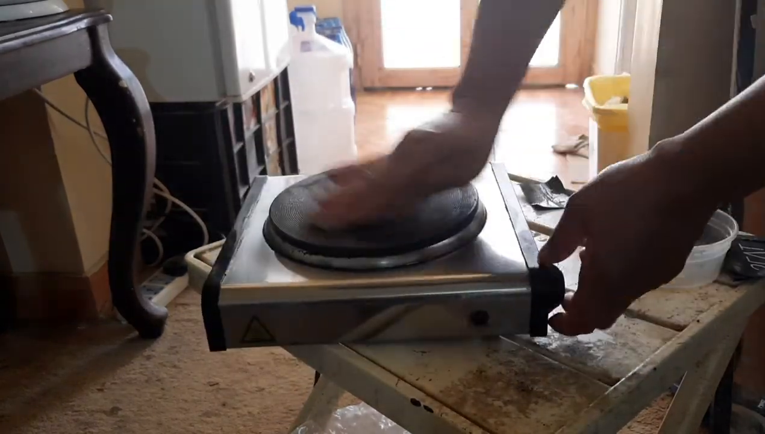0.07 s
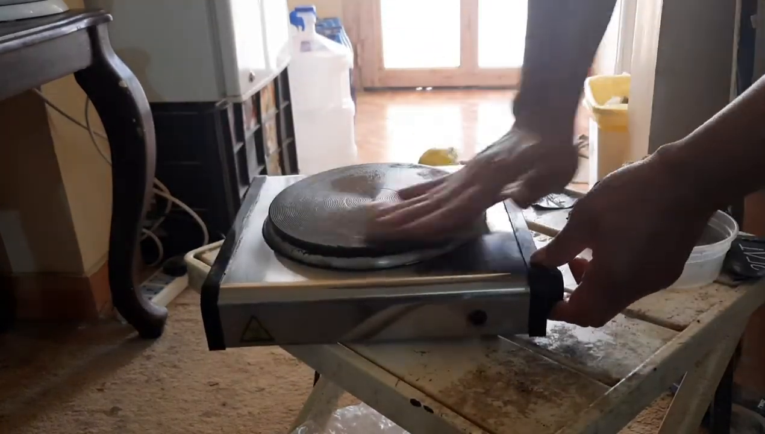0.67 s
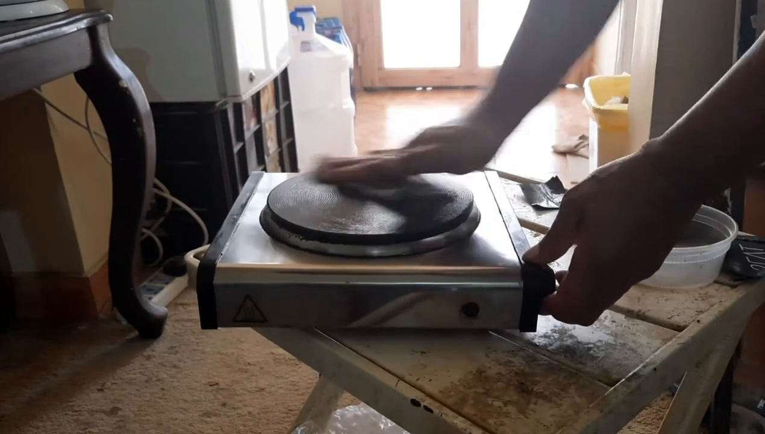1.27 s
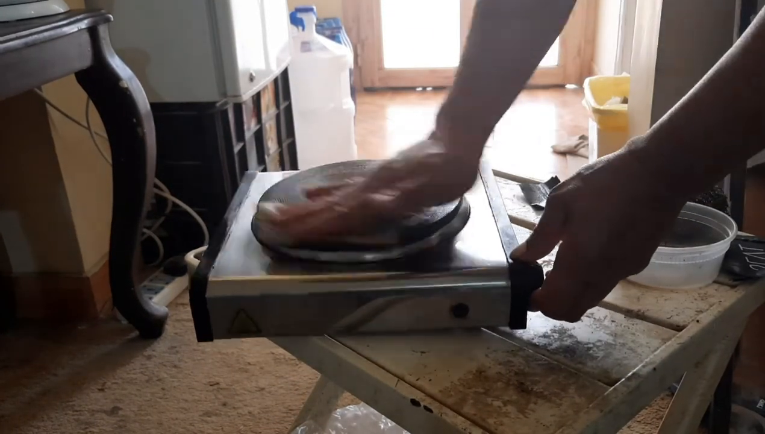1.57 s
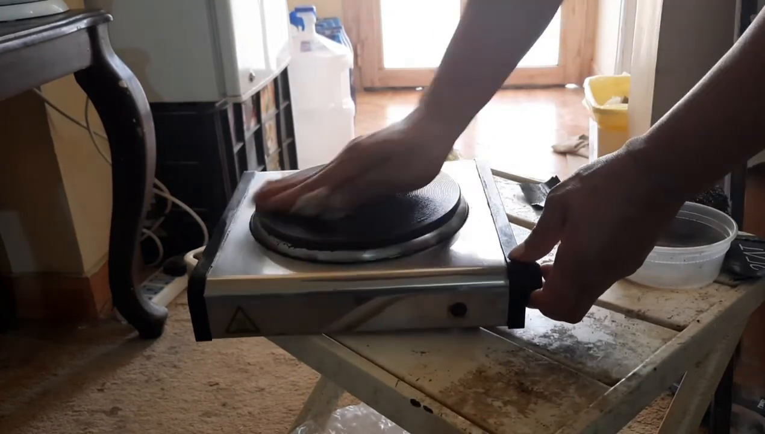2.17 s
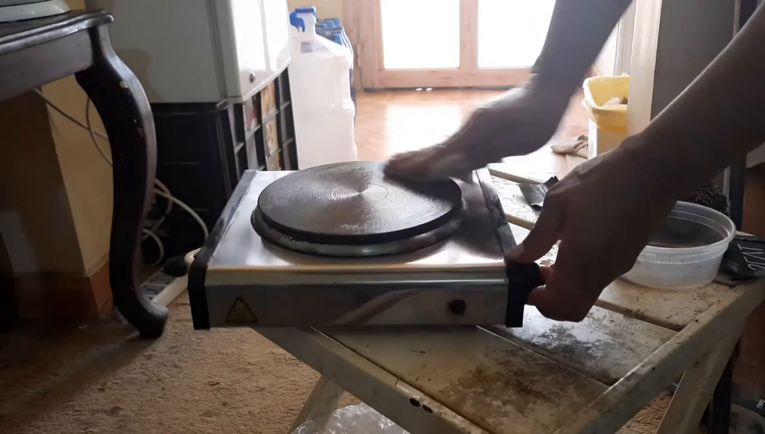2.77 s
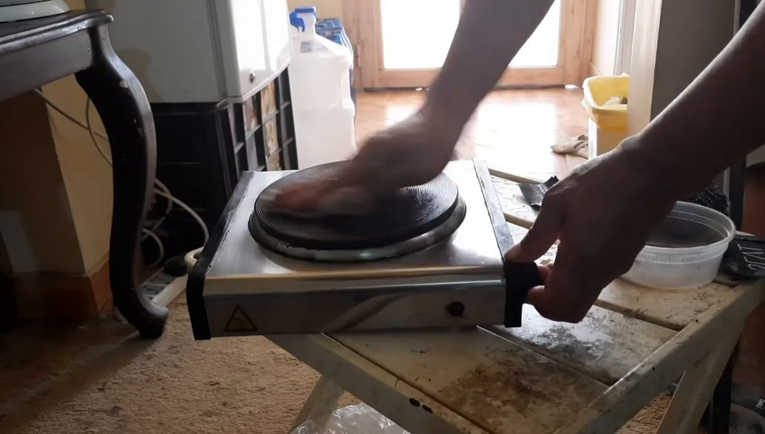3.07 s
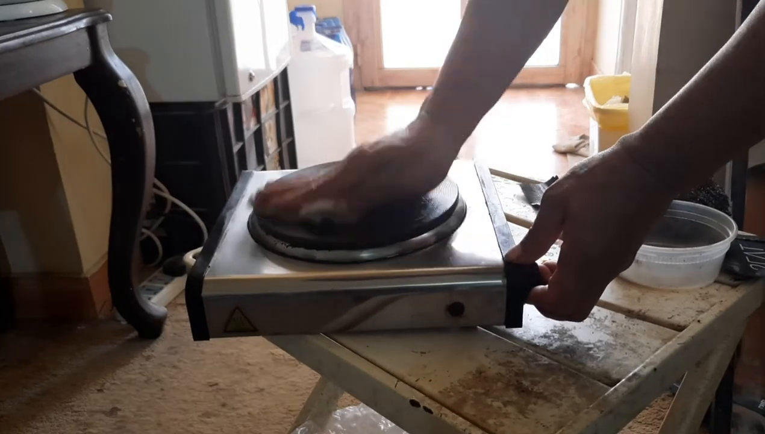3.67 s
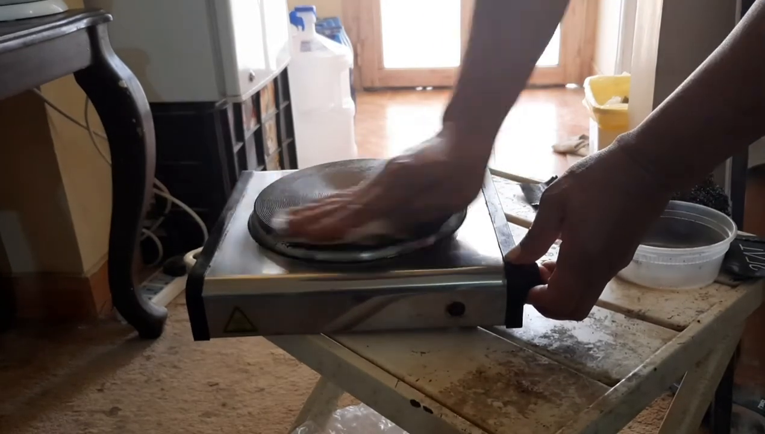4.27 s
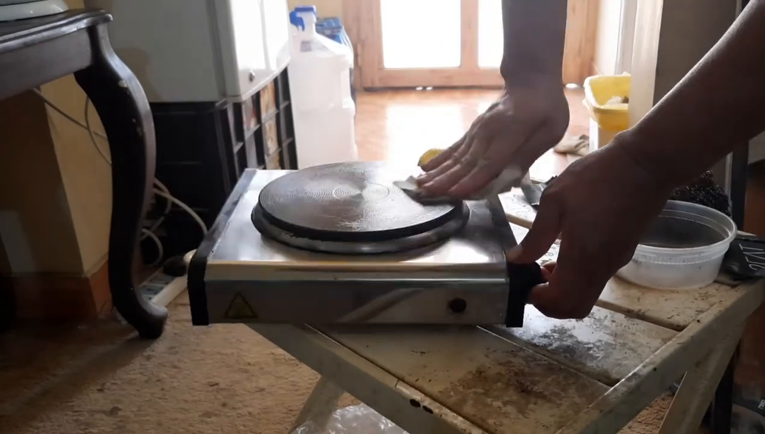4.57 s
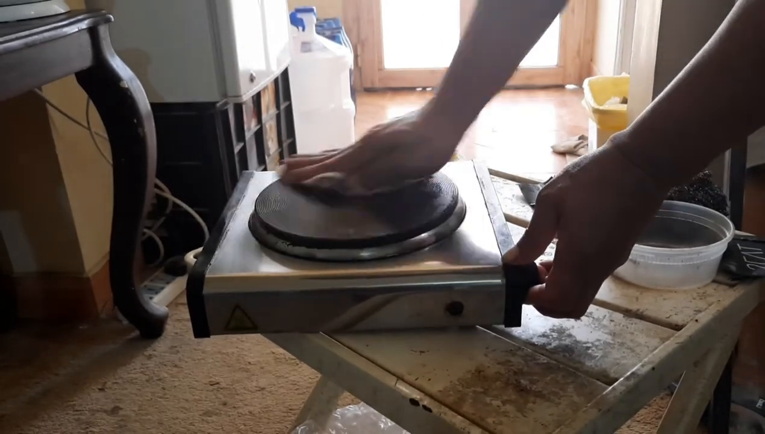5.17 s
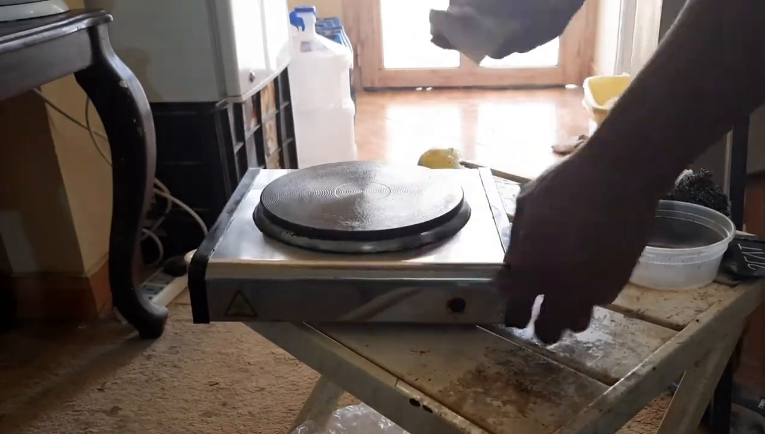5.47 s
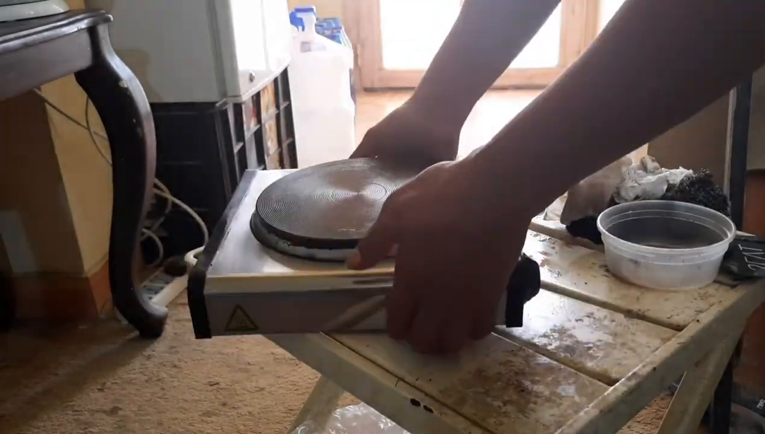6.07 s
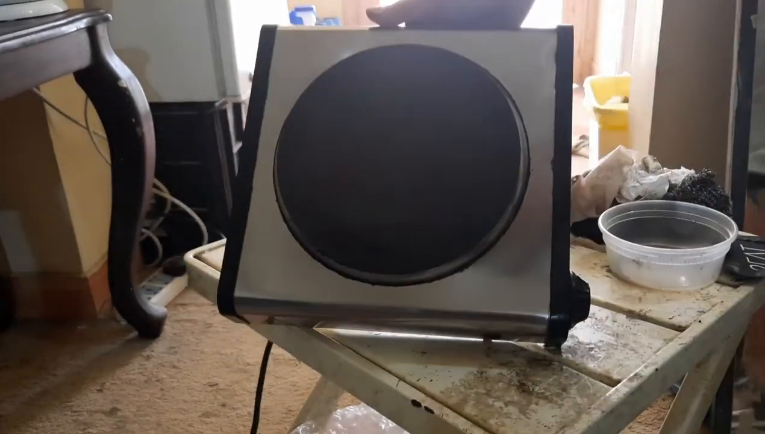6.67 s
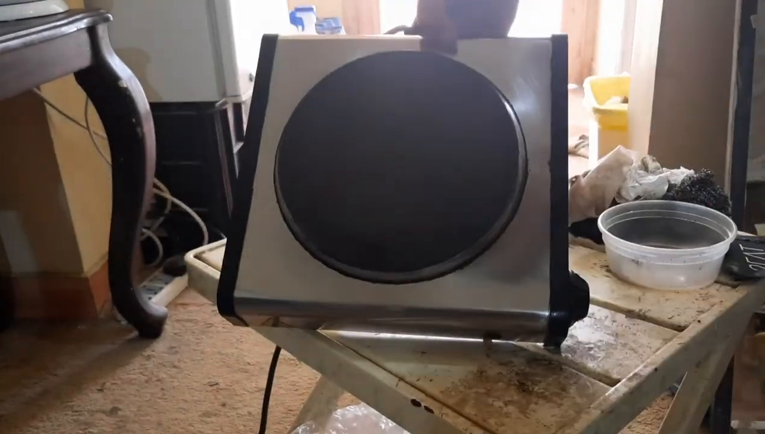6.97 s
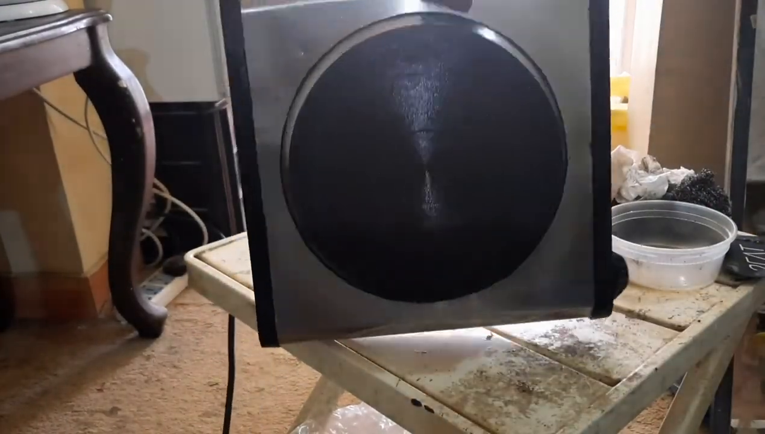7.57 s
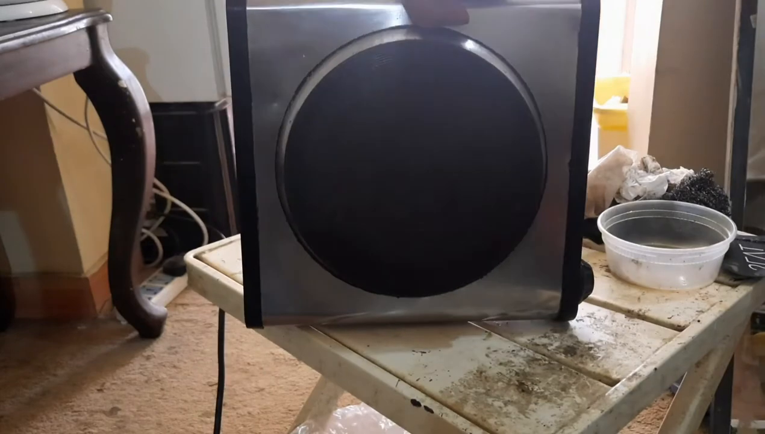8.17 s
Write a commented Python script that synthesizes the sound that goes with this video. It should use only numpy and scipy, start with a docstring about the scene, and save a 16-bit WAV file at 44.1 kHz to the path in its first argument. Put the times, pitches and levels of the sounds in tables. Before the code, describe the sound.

A pad scrubs a metal hot plate with a fluttering hiss and rocking knocks, then duller bumps follow over a faint motor hum.

```python
"""A motor hums in a small room while a hand scrubs an electric hot plate close by: stick-slip friction
of the pad makes a fluttering hiss. The shoves rock the appliance on a folding table; its feet knock and
chatter, each impact exciting the modes of the sheet-metal housing, and the pad scrapes over the rim.
After five seconds the scrubbing stops. The housing is gripped, tipped up and set on its edge with soft
slides of the hand and a few duller knocks, while the hum swells and sinks."""
import sys
import numpy as np
from scipy import signal
from scipy.fft import rfft, irfft, next_fast_len
from scipy.io import wavfile
from scipy.ndimage import uniform_filter1d

SR = 44100
rng = np.random.default_rng(int(sys.argv[2]) if len(sys.argv) > 2 else 0)


def unload_audio(sound):
    """Save the sound as a 16-bit wav file, at the path given as the first command line argument."""
    columns = np.transpose(np.atleast_2d(sound))
    # keep every value between -1 and 1, then stretch to whole-number steps
    steps = np.round(np.clip(columns, -1, 1) * 32767)
    wavfile.write(sys.argv[1], SR, steps.astype(np.int16))


N = 367353
T = np.arange(N) / SR


def undb(db):
    """Level to amplitude ratio."""
    return 10 ** (np.asarray(db) / 20)


def unit(x):
    """Normalisation to rms 1."""
    return x / np.sqrt(np.mean(x ** 2) + 1e-30)


def sides(db):
    """Stereo gains for a level difference, left over right."""
    return undb(np.array([[db], [-db]]) / 2)


def colour(x, points):
    """Spectral shaping through (f/Hz, gain/dB) points."""
    size = next_fast_len(x.shape[-1])
    hz, db = np.transpose(points)
    f = np.maximum(np.fft.rfftfreq(size, 1 / SR), 1)
    gain = undb(np.interp(np.log(f), np.log(hz), db))
    return irfft(rfft(x, size) * gain, size)[..., :x.shape[-1]]


def cut(x, hz, kind, order=2):
    """Causal Butterworth filtering."""
    return signal.sosfilt(signal.butter(order, hz, kind, fs=SR, output="sos"), x)


# Stereo width: f/Hz, side over mid/dB
WIDTH = [(60, -4.5), (170, -22), (350, -4.5), (700, -3.5), (1500, -1.5), (4000, 0)]
def noise(points, size=N):
    """Partially coherent stereo noise, most alike in the bass."""
    mid, side = rng.standard_normal((2, size))
    return unit(colour(mid + colour(side, WIDTH) * np.array([[1], [-1]]), points))


def walk(rate):
    """Smooth random modulation of rms 1."""
    hold = int(SR / rate)
    steps = np.repeat(rng.standard_normal(N // hold + 1), hold)
    return unit(uniform_filter1d(steps, hold)[:N])


def fade(t, t60):
    """Exponential decay, 60 dB in t60."""
    return np.exp(-np.log(1000) * t / t60)


def bump(t, sigma):
    """Gaussian envelope about t = 0."""
    return np.exp(-np.minimum((t / sigma) ** 2 / 2, 20))


def add(out, x, s):
    """Superposition of x from time s."""
    i = max(int(s * SR), 0)
    out[:, i:i + x.shape[1]] += x[:, :N - i]


# Room noise spectrum: f/Hz, relative density/dB
AIR = [(15, -18), (25, -14), (59, -3), (116, -10), (169, -6), (200, -14), (240, -10), (274, -15.5),
       (340, -4.5), (495, -13), (567, -7), (871, -24.5), (2300, -32), (2850, -31.5), (3530, -37),
       (9000, -43.5), (12500, -39.5), (15500, -40)]
# Course of the motor's main tone: t/s, level/dB
DRONE = [(0.15, -69.5), (5.45, -67.5), (6.2, -69.5), (7.05, -63.5), (7.42, -72.5), (8.2, -71)]
# Its other lines: f/Hz, level/dB
HUM_LINES = [(59.2, -83.5), (172.3, -72), (229.5, -76), (344.5, -95.5), (516.8, -106.5), (628.5, -81.5),
             (716, -83.5), (1373, -101), (2116, -100), (2859, -94)]
def motor_and_air(drone_hz=572, waver_db=0.6):
    """A motor's line spectrum, weakly modulated, and its narrow-band whine lie over broadband noise."""
    out = undb(-69) * noise(AIR)
    drone = (drone_hz, np.interp(T, *np.transpose(DRONE)))
    for hz, db in [drone, *HUM_LINES]:
        phase = 2 * np.pi * (hz * T + rng.random()) + .15 * walk(4) + .25 * rng.standard_normal((2, 1))
        out += np.sqrt(2) * undb(db + waver_db * walk(4)) * np.sin(phase)
    whine = unit(cut(rng.standard_normal((2, N)), [2800, 2950], "bandpass"))
    return (out + undb(-90) * whine) * sides(3.4)


# Two spells of scrubbing, the pad lifted between: t/s, relative level/dB, rasp gain from pressing/dB
SCRUB_SPELLS = [
    [(0.0, -76, -2), (0.04, -69.5, -9), (0.35, -69.5, -4), (0.62, -69, 3), (0.84, -65.5, -4.5),
     (1.0, -71.5, -0.5), (1.5, -67, 2.5), (1.63, -71.5, 0.5), (1.75, -105, -16)],
    [(1.88, -101, 0), (1.97, -68, 1.5), (2.4, -70.5, -1.5), (2.75, -67.5, -2), (2.86, -67.5, -6),
     (3.05, -70.5, -0.5), (3.3, -70, -5.5), (3.6, -68.5, -0.5), (4.0, -70, 0.5), (4.25, -66, -0.5),
     (4.4, -66, -3), (4.85, -69.5, -1), (5.05, -70.5, 1.5), (5.26, -69, -1), (5.36, -100, -6)],
]
# Friction spectra of the gliding and the pressed pad: f/Hz, relative density/dB
HISS = [(2500, -18.5), (5000, -6.5), (8500, -5), (10000, -4), (12500, 0), (15500, -4.5)]
RASP = [(500, -10), (1200, -12.5), (2200, -7), (3500, -5.5), (5300, -5.5), (7000, -10.5), (10000, -37.5),
        (15000, -10.5)]
def scrubbing(hiss_db=2, rasp_db=-1, shove_db=3.5, flutter_db=1.36, grip_db=1.7, reflection=0.27):
    """Friction noise: fibres catch and slip on the plate, louder and raspier at each shove."""
    s, level_db, press_db = np.vstack(SCRUB_SPELLS).T
    push_db = shove_db * shoving()
    speed = undb(np.interp(T, s, level_db, right=-120) + push_db)
    press = undb(np.interp(T, s, press_db) + rasp_db + push_db)
    sound = speed * (undb(hiss_db) * noise(HISS) * sides(2.2) + press * noise(RASP) * sides(0.75))
    judder = unit(cut(rng.standard_normal(N), [20, 55], "bandpass"))
    sound *= undb(flutter_db * judder + sticking() + grip_db * walk(20))
    # comb filtering: the path reflected off the steel top changes as the hand circles
    lag_s = 0.000567 * np.exp(0.276 * walk(7))
    sound += reflection * np.array([np.interp(T - lag_s, T, channel) for channel in sound])
    sway_db = np.array([[.8], [-.8]]) * walk(4)
    return sound * undb(sway_db)


# Runs of the hopping pad: t/s, duration/s, hop rate/Hz, typical dip/dB
HOPS = [(0.01, 0.26, 21.3, 9), (0.33, 0.56, 13.1, 8), (0.926, 0.42, 15.05, 8), (3.035, 0.55, 9.8, 6.5),
        (4.38, 0.35, 6.25, 9)]
def sticking(stick_share=0.099, jitter_s=0.0018, uneven=0.45):
    """Stick-slip motion: the pad sticks once a hop, so the level (in dB) dips almost periodically."""
    dips = np.zeros(N)
    for start, length, rate, depth_db in HOPS:
        for at in np.arange(start, start + length, 1 / rate):
            late, deeper = rng.standard_normal(2)
            dip = bump(T - at - jitter_s * late, stick_share / rate)
            dips -= depth_db * np.exp(uneven * deeper) * dip
    return dips


def tilt(s):
    """Tipping of the housing: 0 on its feet until 6 s, 1 on its edge from 6.5 s."""
    return np.interp(s, (6.0, 6.5), [0, 1])


def chatter(size, chatter_s=.0072, bounce=0.64):
    """Inelastic rebound: one impulse, then eight small ones that die away."""
    force = np.zeros(size)
    when = (np.arange(8) + rng.random(8)) / 4
    force[(when * chatter_s * SR).astype(int)] = bounce * rng.choice([-1, 1], 8) * bump(when, 1)
    force[0] = 1
    return force


# Modes of the sheet-metal housing: f/Hz, relative level/dB, T60 without the hand/s
HOUSING_MODES = [(180, -14, .14), (258, -7, .11), (282, -8, .1), (307, -2, .14), (327, -5, .14),
                 (356, 0, .16), (403, -5, .1), (428, -9, .1), (495, -14, .11), (526, -13, .1),
                 (582, -13, .1), (624, -10, .12), (656, -13, .1), (724, -11, .1), (752, -9, .1),
                 (783, -9, .11), (815, -8, .12), (875, -13, .1), (1062, -14, .12), (1170, -17, .1),
                 (1268, -16, .12), (1420, -14, .13), (1600, -22, .1), (1945, -23, .12), (2540, -29, .1),
                 (2770, -28, .1), (4100, -35, .1), (4430, -33, .1), (4970, -35, .1)]
# Dense, weaker modes of its panels: f/Hz, relative density/dB
PANELS = [(40, -6.5), (140, -17.5), (230, -7.5), (320, 2), (400, 7), (530, 0), (650, 3.5), (800, 1),
          (960, -14), (1450, -7), (2000, -15), (2800, -16), (3100, -25.5), (5000, -34.5), (8000, -50.5),
          (15000, -47)]
def housing_ring(t, ring_hz, tipped, scatter_db=1.2, hand_damping=1.31):
    """Modal superposition: the point of impact favours modes near ring_hz; the hand damps them all."""
    hz, db, t60 = np.transpose(HOUSING_MODES)[:, :, None]
    count = len(hz)
    purer_db = 4 * tipped  # the soft edge gives a rounder bump
    favour_db = (4 + purer_db) * np.exp(-(np.log(hz / ring_hz) / 0.021) ** 2)
    gain = undb(db + favour_db + scatter_db * rng.standard_normal((count, 1)))
    polarity = np.pi * rng.integers(0, 2, (count, 1))
    phase = polarity + 0.53 * np.sqrt(hz / 350) * rng.standard_normal((2, count, 1))
    modes = np.sum(gain * fade(t, t60 / hand_damping) * np.sin(2 * np.pi * hz * t + phase), axis=1)
    panels = noise(PANELS, len(t)) * fade(t, t60=0.13)
    return unit(modes) + undb(-1 - purer_db) * unit(panels)


def knock(body_db, hardness_db, tipped, contact_s=0.00058, thud_db=-18.5):
    """Impact excitation: harder contact gives more clang and crack; on its edge the housing is duller."""
    t = np.arange(SR // 3) / SR
    harder_db = hardness_db + 10  # above a typical blow
    ring_hz = (1 - tipped) * (349.7 - 5 * harder_db) + tipped * 312.2
    clang_db = hardness_db + 2.98
    crack_db = -16.5 + 1.22 * harder_db - 2 * tipped
    treble_db = np.clip((body_db + crack_db + 54.5) / 2, -8, 4)
    # vibration takes a moment to spread from the soft foot through the metal
    onset = 1 - np.exp(-t / (contact_s * (1 + 2 * tipped)))
    ring = housing_ring(t, ring_hz, tipped) * onset
    sound = signal.fftconvolve(ring, chatter(len(t))[None], axes=1)[:, :len(t)]
    body = unit(cut(sound, [230, 440], "bandpass"))
    clang = unit(cut(sound, [610, 1050], "bandpass", order=3))
    crack = unit(colour(cut(sound, 1000, "highpass", order=4), [(2500, 0.0067), (4500, treble_db)]))
    thud = table_thud(t, onset)
    return undb(body_db) * (body + undb(clang_db) * clang + undb(crack_db) * crack + undb(thud_db) * thud)


def table_thud(t, onset):
    """Damped low-frequency vibration of the struck table."""
    shake = noise([(25, -23), (70, -10.5), (120, -5.5), (170, 1), (300, 2)], len(t))
    return unit(cut(shake * fade(t, t60=0.2) * onset, 173, "lowpass"))


# Landings of the housing: t/s, relative body level/dB, hardness/dB, next foot over first/dB
KNOCKS = [(0.418, -39.5, -9.5, -7), (0.553, -44.5, -5.5, -2.5), (0.598, -34, -4.5, -1.5),
          (0.701, -41, -6.5, -1.5), (0.738, -33.5, -6, -2.5), (0.974, -41.5, -16, -13),
          (1.067, -44.5, -7, -1), (1.162, -43.5, -14.5, -11), (1.28, -48.5, -20, -14), (1.387, -43, -6, 5),
          (1.463, -34, -8.5, -8.5), (1.53, -37, -8, 0.5), (1.65, -43.5, -15.5, -20),
          (1.957, -44, -13.5, -4.5), (2.017, -34, -11.5, -3.5), (2.16, -47.5, -12.5, -12),
          (2.293, -41.5, -8, 2.5), (2.431, -46, -16, 6.5), (2.464, -33, -7.5, -18),
          (2.623, -34.5, -7.5, -1.5), (2.763, -44, -20, -7), (2.811, -38, -7.5, -5.5),
          (2.904, -51, -15.5, 1.5), (2.943, -38, -6, 0.5), (3.458, -44.5, -13, -13), (3.642, -41.5, -9, -2),
          (3.813, -50, -25, -20), (3.852, -34.5, -11, -11.5), (3.951, -48, -17, -4),
          (4.017, -38.5, -12, -15.5), (4.154, -46.5, -16, -3), (4.199, -34.5, -10.5, -6),
          (4.364, -53.5, -18.5, -0.5), (4.434, -38.5, -12, -11), (4.553, -45.5, -18, -1.5),
          (4.595, -35.5, -11, -7.5), (4.737, -38, -10, -19), (4.925, -43, -7, -7.5),
          (5.037, -32.5, -13, -12.5), (5.183, -39, -7, -9.5), (5.735, -47.5, -18, -14),
          (5.92, -49.5, -33, -12.5), (6.18, -62, -13, -14), (6.611, -35, -17.5, -21),
          (6.62, -28.5, -20.5, -30), (7.2, -59, -9, 6.5), (7.244, -38.5, -21.5, -7.5),
          (7.563, -43.5, -9.5, -0.5), (7.691, -52.5, -2.5, -8)]
def rocking(level_db=-9, next_foot_s=0.024, less_hard_db=6.5):
    """Rocking of a rigid body: one foot lands, then the next with a softer contact."""
    out = np.zeros((2, N))
    for s, db, hardness_db, next_db in KNOCKS:
        tipped = tilt(s)
        place = undb(-1.2 * tipped) * sides(3.4 - 2.2 * tipped)
        add(out, knock(db, hardness_db, tipped) * place, s)
        add(out, knock(db + next_db, hardness_db - less_hard_db, tipped) * place, s + next_foot_s)
    return out * undb(level_db)


def shoving(rise_s=0.0027, fall_s=0.024, full_knock_db=-31):
    """Force pulses: each shove that rocks the housing also jolts the pad, then eases off."""
    out = np.zeros((1, N))
    t = np.arange(SR // 2) / SR
    jolt = (1 - np.exp(-t / rise_s)) * bump(t, fall_s)
    for s, db, *_ in KNOCKS:
        add(out, undb((db - full_knock_db) / 2) * jolt[None], s)
    return out[0]


# Scrapes and brushes of pad or hand, plus the sharp ticks of three hard knocks (the narrowest rows):
# t/s, level/dB, Gaussian width/s, centre f/Hz
SCRAPES_AND_TICKS = [(0.608, -66, 0.024, 4150), (2.472, -50.5, 0.0039, 5000), (2.631, -51.5, 0.0057, 4320),
                     (2.841, -53, 0.018, 3730), (2.967, -58, 0.016, 4000), (3.426, -68.5, 0.045, 1890),
                     (4.599, -60.5, 0.011, 5000), (5.254, -64.5, 0.019, 5670), (6.302, -70.5, 0.0084, 1500),
                     (6.389, -67, 0.016, 7160), (6.44, -65.5, 0.014, 4140), (6.585, -63, 0.015, 4600),
                     (6.588, -77, 0.072, 7500), (7.032, -76, 0.02, 5430), (7.099, -77, 0.026, 10100),
                     (7.242, -77.5, 0.039, 5160), (7.697, -58.5, 0.0035, 4070), (7.743, -76.5, 0.044, 9500),
                     (7.888, -77, 0.041, 1610), (8.014, -73, 0.041, 7360)]
# The table shaken by each: f/Hz, relative density/dB
RUMBLE = [(25, -43), (70, -7), (150, -14), (300, -9), (1000, -55)]
def scrapes_and_ticks(grain_db=1.5, rumble_db=-1, rumble_s=0.02):
    """Noise bursts from friction or hard impact; lying flat, the housing couples them into the table."""
    out = np.zeros((2, N))
    size, lead_s = SR // 3, 1 / 6
    t = np.arange(size) / SR - lead_s
    for s, db, width, hz in SCRAPES_AND_TICKS:
        band = noise([(hz / 8, -22), (hz / 2, -6), (hz, 0), (hz * 2, -8), (hz * 4, -22)], size)
        coupling = (1 - tilt(s)) * undb(rumble_db)
        rumble = coupling * noise(RUMBLE, size) * bump(t - rumble_s / 2, rumble_s)
        add(out, undb(db) * (band * bump(t, width) + rumble), s - lead_s)
    return out * undb(grain_db * walk(500))


def room(x, wet_db=-19, t60=0.12, gap_s=.012):
    """Reverberation: wall reflections add a short, diffuse tail."""
    t = np.arange(SR // 2) / SR
    diffuse = noise([(100, -22), (1000, -9.5), (4000, 10), (15000, 8)], len(t))
    tail = diffuse * fade(t, t60) * (t > gap_s)
    tail /= np.sqrt(np.sum(tail ** 2) / 2)
    return x + undb(wet_db) * signal.fftconvolve(x, tail, axes=1)[:, :N]


def scene():
    """Superposition of the hum with pad, knocks, scrapes and ticks in the room."""
    return motor_and_air() + room(scrubbing() + rocking() + scrapes_and_ticks())


def record(dry, top_hz=15750):
    """Band limiting: a steep low-pass removes the highest treble."""
    return signal.sosfilt(signal.ellip(10, .2, 70, top_hz, fs=SR, output="sos"), dry)


dry = scene()
out = record(dry)
unload_audio(out)
```